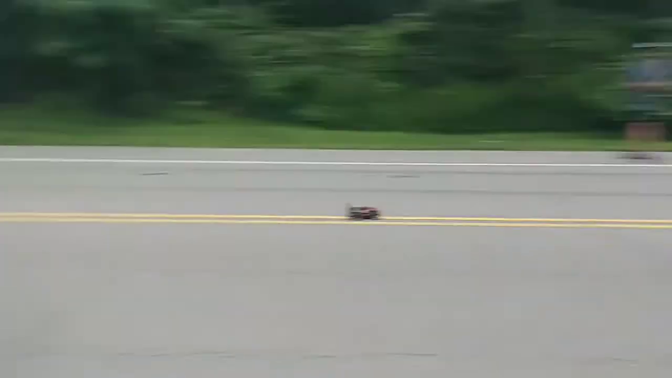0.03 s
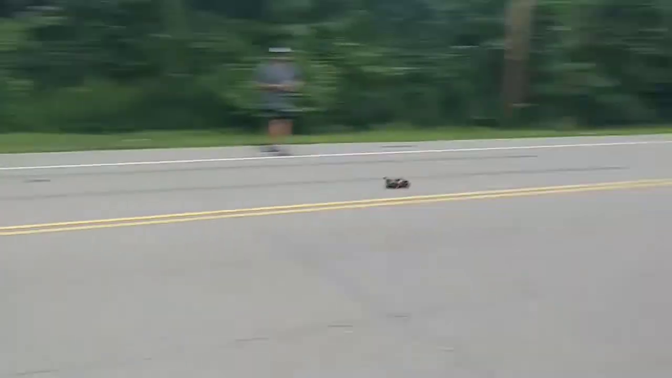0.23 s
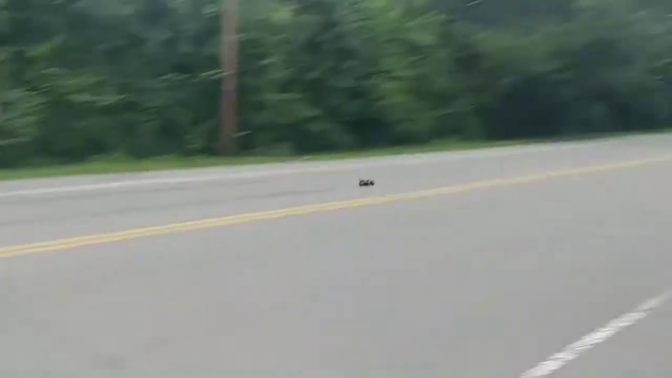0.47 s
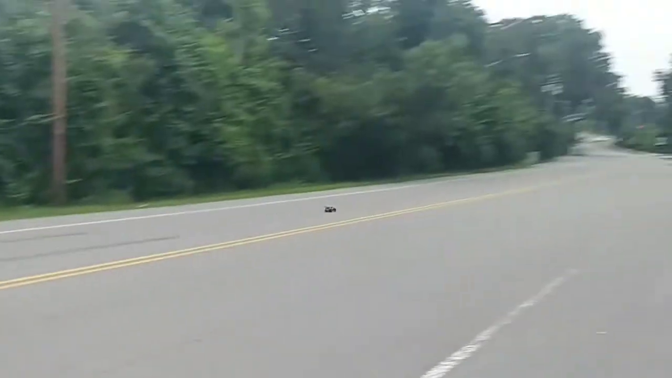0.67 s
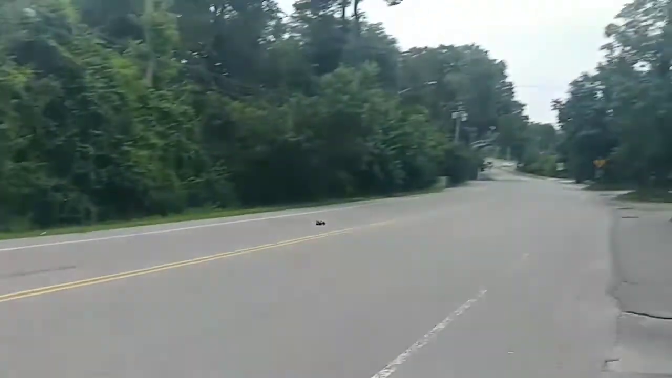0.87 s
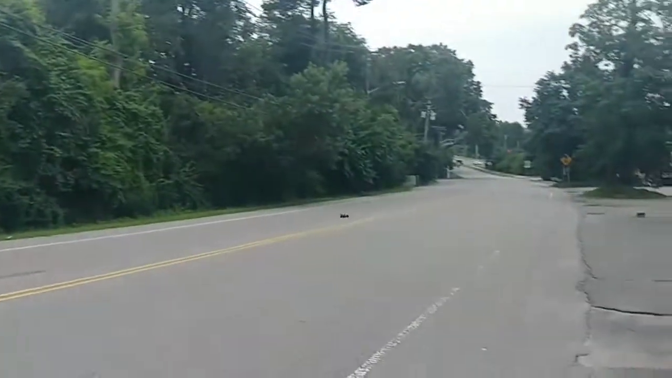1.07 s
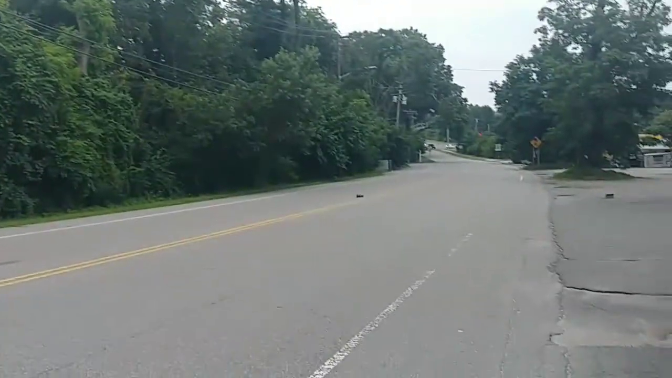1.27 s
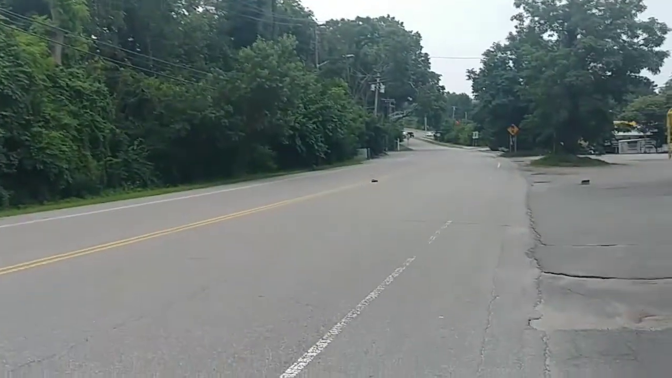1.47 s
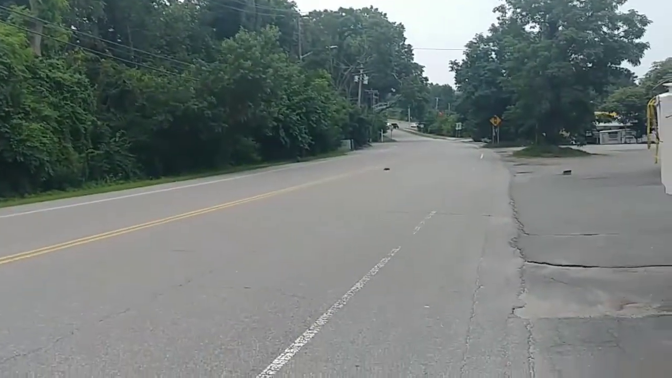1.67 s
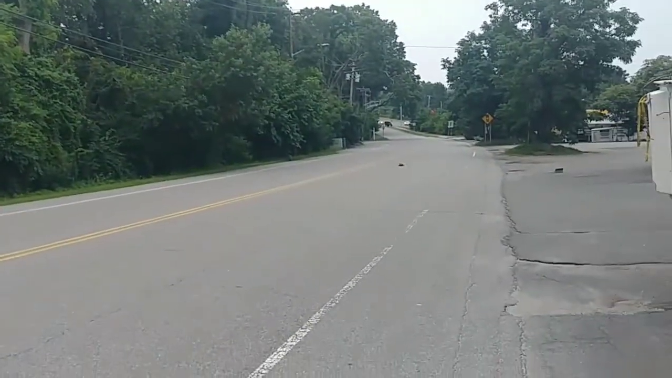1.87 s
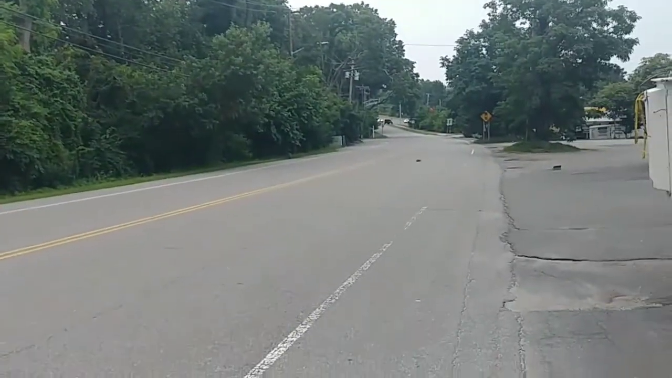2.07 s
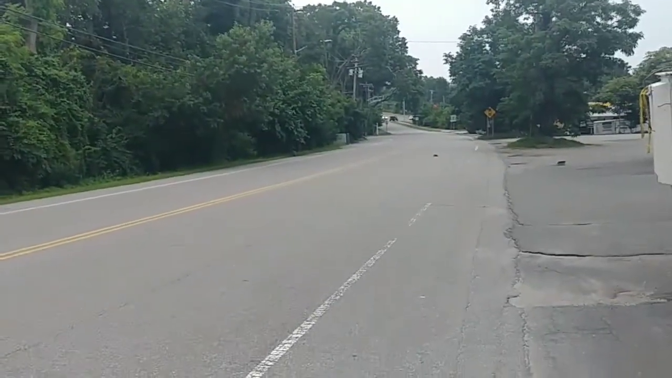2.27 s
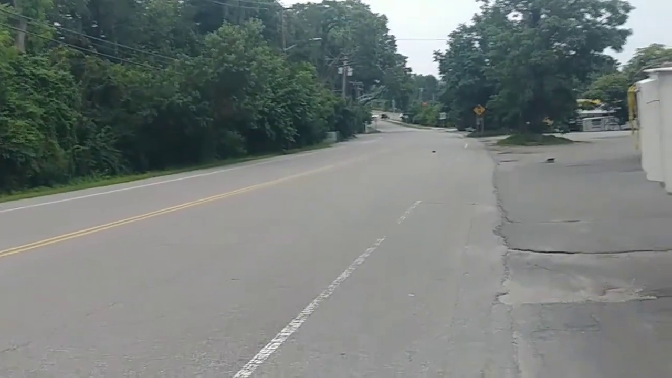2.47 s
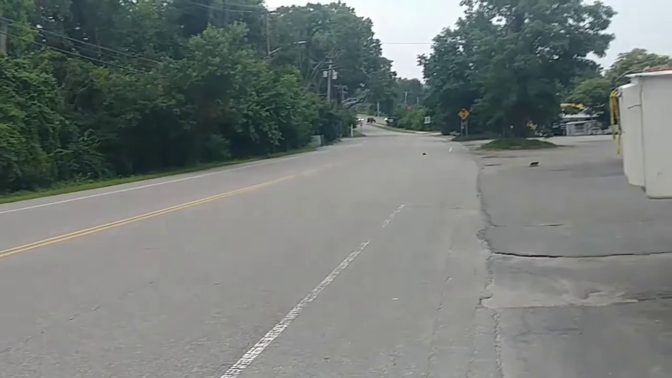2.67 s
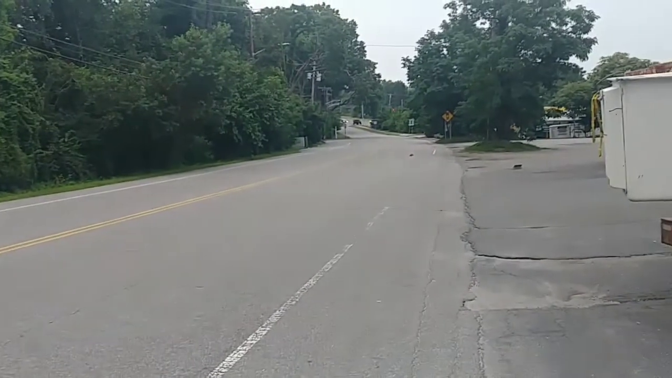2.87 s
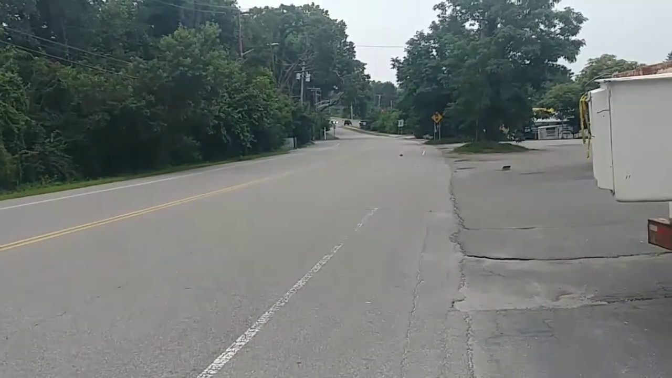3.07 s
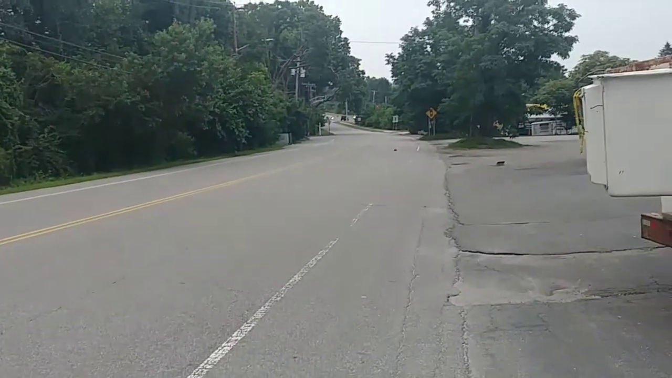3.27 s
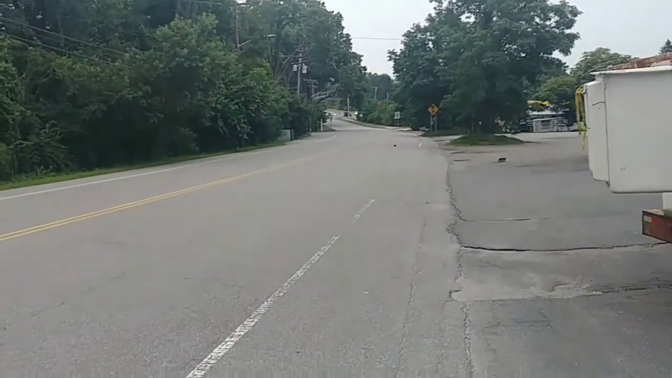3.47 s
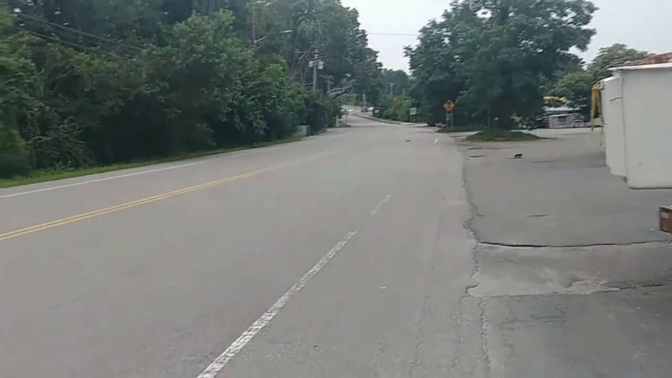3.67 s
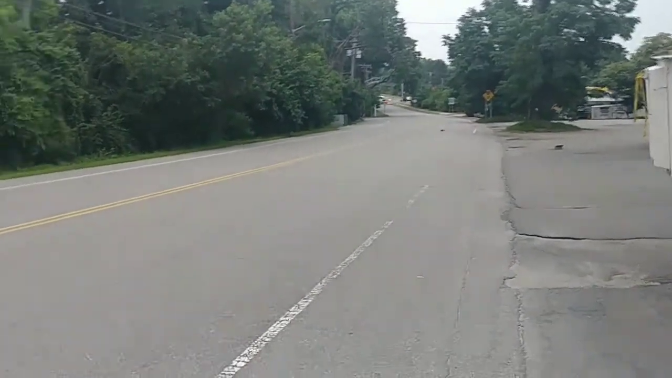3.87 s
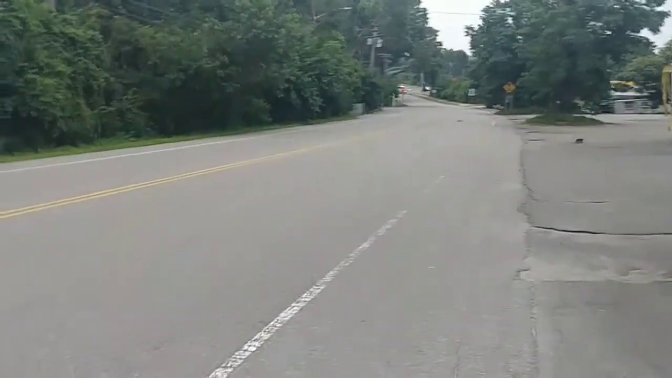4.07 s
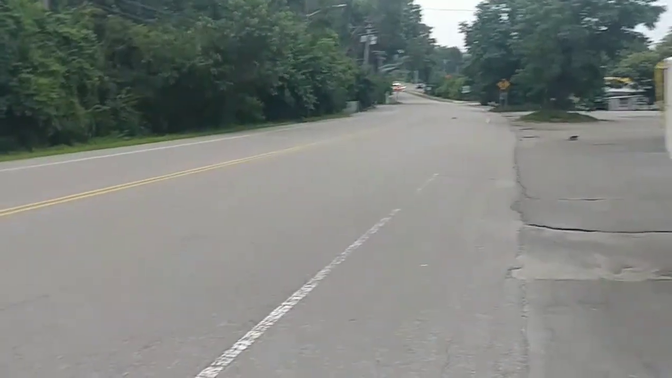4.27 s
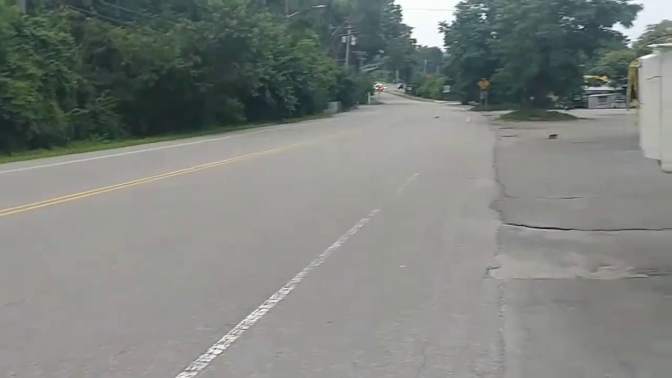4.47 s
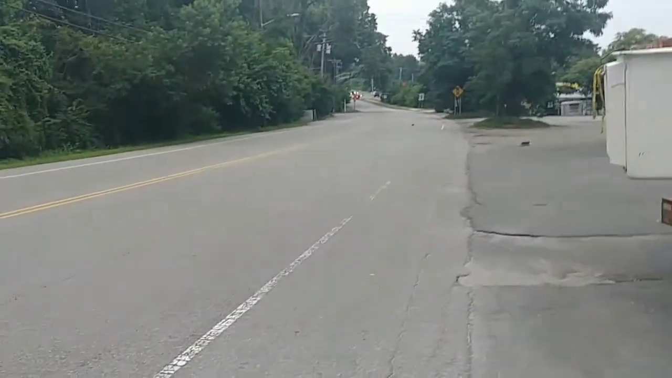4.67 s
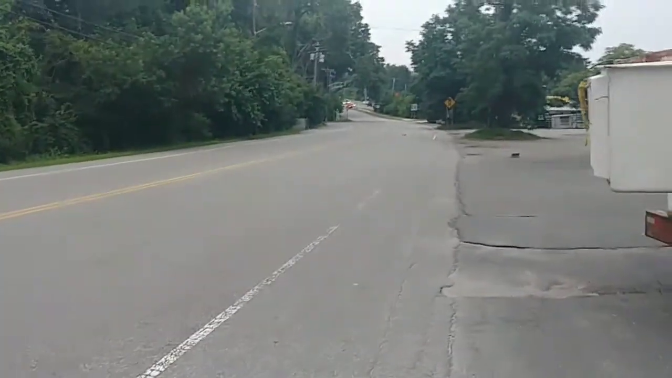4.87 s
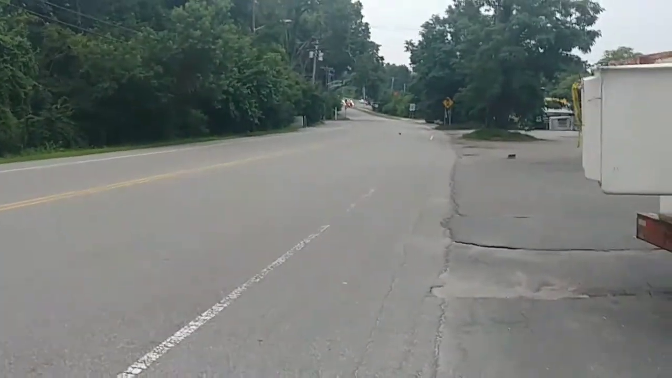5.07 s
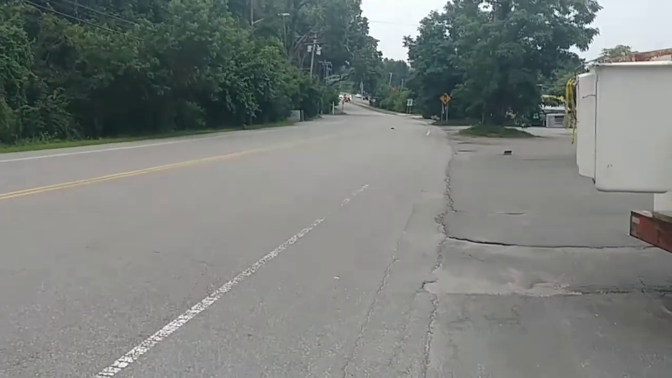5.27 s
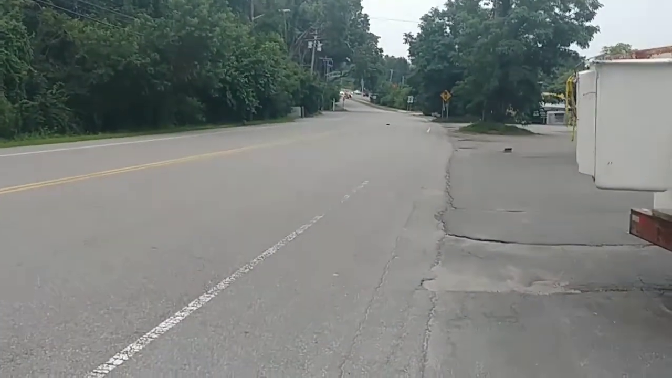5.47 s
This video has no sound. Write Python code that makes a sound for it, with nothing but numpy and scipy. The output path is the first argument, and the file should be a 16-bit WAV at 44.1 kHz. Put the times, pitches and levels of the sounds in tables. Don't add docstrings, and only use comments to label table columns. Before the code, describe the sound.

High gear whine and tyre roar rush away along asphalt, slip in a brief yelp, thin to a hiss, then distant clicks over quiet street hush.

```python
import sys
import numpy as np
from scipy import signal
from scipy.fft import rfft, irfft, next_fast_len
from scipy.io import wavfile
from scipy.ndimage import uniform_filter1d

SR = 44100
rng = np.random.default_rng(int(sys.argv[2]) if len(sys.argv) > 2 else 0)


def put_to_file(sound):
    columns = np.atleast_2d(sound).T
    safe = np.clip(columns, -1, 1)
    whole_steps = np.round(safe * 32767)
    wavfile.write(sys.argv[1], SR, whole_steps.astype(np.int16))


def amplitude_ratio(level_db):
    exponent = np.asarray(level_db, float) / 20
    return 10 ** exponent


N = 243449
T = np.arange(N) / SR

# f/Hz, density/dB per Hz
STREET = [(20, -88.5), (45, -83), (65, -74), (100, -76), (170, -72.5), (260, -77.5), (500, -84),
          (1000, -85), (1600, -89), (2200, -91), (4000, -99), (5600, -104), (8000, -108), (12600, -111),
          (13300, -121), (16000, -121)]
# t/s, length/s, f/Hz, level/dB
PUFFS = [(0, 0.2, 179, -54), (.12, .2, 54.2, -58), (0.28, 0.25, 185, -57.5), (0.522, 0.24, 175.6, -55.5),
         (2.498, .05, 170, -58.5), (2.98, 0.24, 166.3, -53.5), (2.898, .25, 65, -64.5),
         (3.289, 0.1, 192, -58.5), (3.498, .2, 60.1, -66), (4.35, 0.18, 149.2, -60.5),
         (4.321, 0.24, 75, -62)]
# t/s, length/s, f/Hz, level/dB
ECHOES = [(.68, 0.1, 385, -63), (.79, .12, 365, -59.5), (1.765, 0.21, 1010, -62.5),
          (2.5, .07, 1040, -64), (1.94, 0.089, 1220, -62.5), (1.5, .07, 1210, -63),
          (1.72, 0.15, 1650, -75), (1.7, 0.066, 1900, -68), (1.95, 0.08, 1500, -63.5),
          (2.7, .07, 1200, -66.5), (2.02, 0.35, 1900, -66.5), (1.87, 0.59, 2130, -63.5),
          (2.2, 0.17, 2150, -62), (2.09, 0.24, 2000, -70), (2.12, 0.087, 1070, -66.5),
          (2.26, 0.089, 1660, -62), (2.325, 0.049, 1725, -63), (2.1, 0.0695, 960, -70),
          (2.2, .1, 380, -71), (2.79, 0.064, 800, -61.5), (2.5, 0.13, 1485, -67),
          (1.8, .14, 2400, -68),
          (2.97, .54, 2660, -63.5), (3.37, .06, 2176, -68.5), (3.62, .3, 2620, -71),
              (3.66, 0.095, 2100, -69), (3.667, .08, 1770, -69), (3.702, 0.08, 1400, -69.5),
              (3.7, .06, 1050, -67), (3.926, .08, 2050, -69), (3.979, .06, 1460, -65),
              (3.992, .06, 1780, -68), (4.035, .03, 1393, -68), (4.09, .07, 1150, -72),
              (4.102, .06, 1440, -74), (3.74, .14, 5050, -84), (4.1, .055, 2880, -76),
              (4.2, .09, 3050, -78), (4.431, .08, 2950, -74), (4.7, .08, 3074, -76),
              (5.038, .19, 3194, -74), (5.27, .08, 3205, -72.5), (5.387, .13, 3640, -76.5),
              (5.41, .14, 3000, -72), (5.171, .13, 4450, -79), (5.32, .22, 4470, -78.5),
              (4.933, .1, 3137, -77.5), (4.03, .44, 8400, -92), (4.6, .45, 8470, -88),
              (4.06, .91, 6900, -86), (4.15, 0.69, 7690, -85), (5.02, .26, 7820, -84.5),
              (5.23, .3, 7790, -89), (5.04, .12, 8500, -89.5), (5.36, .18, 8600, -89)]
# thud/dB, upper crack/dB, echo/dB
STONES = [
    (3.6204, -37, -22, 8, -37),
    (3.654, -18.5, -7, -3, -35),
    (3.915, -17.5, -36, -4.5, -40),
    (3.924, -26.5, -32, -12, -29.5),
    (3.944, -54, -20, -8, -27),
    (4.017, -36, -18, 8.5, -42),
    (4.057, -20.5, -7, -11, -48),
]
# t/s, peak
# level/dB, f/Hz
TICKS = [(2.9, -33, 3123), (3.045, -31, 3535), (3.5743, -44, 4020), (3.607, -39, 3950),
         (3.6545, -40.5, 930), (3.7609, -33, 3920), (3.831, -34, 3830), (4.117, -52, 4040),
         (4.1676, -40, 3920), (4.2023, -32.5, 4030), (4.239, -35, 4060), (4.2735, -34.5, 4100),
         (4.3283, -37, 4040), (4.364, -37, 4020), (4.439, -37.5, 3870), (4.458, -38, 3820),
         (4.4776, -38, 3540), (4.5183, -39.5, 3740), (4.5783, -39.5, 3900), (4.6421, -45, 3640),
         (4.7474, -41.5, 3850), (5.0034, -45.5, 3895)]
# t/s, f/Hz, level/dB
UPPER_SLIDE = [
    (2.44, 1866, -84),
    (2.485, 1830, -53.5),
    (2.56, 1745, -60.5),
    (2.62, 1718, -60),
    (2.68, 1672, -48),
    (2.73, 1652, -56),
    (2.84, 1575, -61),
    (2.9, 1540, -80),
]
LOWER_SLIDE = [
    (2.53, 1050, -76),
    (2.59, 1063, -52),
    (2.66, 1055, -55),
    (2.72, 1065, -52),
    (2.8, 1090, -57),
    (2.87, 1075, -80),
]
# multiple of shaft rate/1, level/dB
SHAFT_ORDERS = [(3, -8), (4, 1), (5, -17), (6, -3.5), (7, 0), (8, 5.5), (9, -3), (10, 0.5), (12, 4.5)]
# t/s, f/Hz, level/dB
MESH = [(0, 4280, -24.5), (.07, 4103, -31.5), (.14, 3814, -26), (.225, 3783, -24.5), (.25, 3916, -19.5),
        (.36, 3996, -17), (.43, 3934, -23), (.55, 3910, -22.5), (.61, 3880, -35), (.67, 3780, -31),
        (.76, 3768, -27.5), (.82, 3690, -30)]
# t/s, f/Hz, level/dB
YELP = [
    (.828, 3330, -39),
    (.84, 3220, -25.5),
    (.864, 3050, -21),
    (.885, 2850, -26),
    (.91, 2700, -27.5),
    (.935, 2590, -29),
    (.96, 2520, -45),
]
# t/s, f/Hz, level/dB
RIDGE = [(.8, 5086, -47), (1.0, 4980, -36.5), (1.1, 4750, -38.5), (1.4, 4246, -35), (1.48, 4400, -38),
         (1.58, 4570, -47), (1.72, 4492, -43), (1.88, 4380, -43), (2.2, 4300, -44.5), (2.5, 4403, -60),
         (4.0, 4550, -67), (4.18, 4600, -66), (4.35, 4500, -74), (4.55, 4520, -60.5), (4.72, 4400, -71)]
# t/s, f/Hz, level/dB
TRAY = [(.81, 3510, -41), (.85, 3330, -19), (.9, 3200, -27), (.97, 3043, -23.5), (1.08, 3188, -28),
        (1.2, 3007, -41), (1.35, 2877, -36), (1.47, 2990, -52), (1.52, 2967, -32.5), (1.62, 3134, -30),
        (1.75, 3190, -35), (1.9, 3070, -53)]
# t/s, gear level/dB, shell f/Hz, shell level/dB re gears (how far it faces the microphone)
CAR = [(0, -13.5, 4170, 9), (.05, -15.5, 4048, 2.5), (.35, -17.5, 4032, -0.5), (.71, -23.5, 3664, -2),
       (.89, -27, 3390, -6), (1.22, -29.5, 3530, -30), (1.66, -33.5, 3296, -25), (1.89, -35.5, 3800, -31),
       (2.18, -34.5, 3726, -8), (2.33, -40, 3680, -2.5), (2.72, -41, 3546, -15), (2.86, -43, 3626, -6.5),
       (3.8, -46, 3952, 0), (4.15, -51.5, 4007, 5), (4.76, -59, 3810, 2), (4.91, -52, 3626, 9.5),
       (5.3, -62, 3900, 3.5), (5.52, -59, 3855, 9.5)]
# t/s, hiss level/dB re gears
LOAD = [(0, -23), (.5, -20.5), (1.0, -21), (1.45, -26.5), (1.68, -19.5), (1.9, -22.5), (2.2, -20.5),
        (2.42, -25), (2.86, -20.5), (3.45, -16.5), (3.68, -16), (3.85, -22), (4.1, -18), (4.5, -21.5),
        (5.52, -24.5)]
# f/Hz, density/dB per Hz
TYRES = [(90, -46.5), (170, -21), (300, -22), (540, -17), (700, -2.5), (1050, 3), (1300, -1), (1700, 3),
         (1950, -2), (2250, 2), (2700, -11.5), (3200, -57)]
GEARS = [(1700, -17.5), (2300, -14.5), (2600, -1), (3200, 1.5), (3900, 1.5), (4500, -0.5), (4850, -14.5),
         (5150, -22), (6000, -35.5), (7000, -52)]
MOTOR = [(5000, -26.5), (5900, -11.5), (6600, -1.5), (7300, 3), (7850, 4), (8400, 0), (9000, -7),
         (9600, -36.5)]
TOP = [(4500, -18.5), (5000, 21.5), (5400, 4), (6000, -15.5), (8500, -8.5), (9500, 2.5), (11500, -3),
       (13200, -14.5), (14300, -2.5), (15700, -4)]
# f/Hz, width/Hz, start t/s
NOTCHES = [
    (510, 194, 0.35),
    (1250, 400, 1.44),
    (1936, 350, 1.62),
]

STREET_FADE_DB, STREET_FADE_S = 1, 4.8
PUFF_WIDTH_HZ = 69
ECHO_Q, ECHO_TONE = 17.5, 0.46
TREES_T60_S = 0.48
TICK_S = 0.0009
SHAFT_HZ, SHAFT_SAG_HZ_PER_S = 105.1, 7.3
ORDERS_DB, ORDERS_LOSS_DB_PER_S, ORDERS_END_S, ORDERS_FADE_S = -40, 13, 0.696, 0.12
LOW_ORDER_LOSS_DB_PER_S = 13
SIDE_SHARE, SIDE_FADE_S = 1.15, 0.33
OVERTONE_DB = -19.5
TYRE_DB, GROUND_KNEE_S, GROUND_LOSS_DB = -6, 1.963, 8.5
TOP_DB, AIR_LOSS_DB_PER_S = -19.5, 2.5
TOP_FOLLOWS, MEAN_LOAD_DB = 0.6, -23
LIFT_S, LIFT_LENGTH_S, LIFT_DROP_DB = 2.48, 0.33, 25
SURGE_DB = 0.5
GEAR_DIP_HZ, GEAR_DIP_WIDTH_HZ, GEAR_DIP_FROM_S, GEAR_DIP_GROWS_S = 2860, 364, 4, 0.2
NOTCH_GROWS_S = 0.12
MARGIN_DB, HOLD_S, DEPTH_DB, LATCH_DB = 5.5, 0.02, -19, 3.2
CUTOFF_HZ = 15800


def rms_one(x):
    return x / np.sqrt(np.mean(x ** 2) + 1e-20)


def in_time(rows):
    s, *columns = np.transpose(rows)
    return [np.interp(T, s, c) for c in columns]


def within(rows):
    return (T > rows[0][0]) * (T < rows[-1][0])


def ramp(start, length):
    return np.clip((T - start) / length, 0, 1)


def at_hz(points, hz):
    f, level = np.transpose(points)
    return np.interp(np.log(hz), np.log(f), level, left=-200, right=-200)


def drift(rate):
    r = np.exp(-80 * np.pi * rate / SR)
    white = rng.standard_normal(N // 40 + 2002)
    slow = signal.lfilter([1], [1, -2 * r, r * r], white)[2000:]
    return np.interp(np.arange(N) / 40, np.arange(len(slow)), rms_one(slow))


def resonance(x, hz, width_hz):
    r = np.exp(-np.pi * width_hz / SR)
    poles = [1, -2 * r * np.cos(2 * np.pi * hz / SR), r * r]
    return signal.lfilter([(1 - r * r) / 2, 0, (r * r - 1) / 2], poles, x)


def coloured(x, spectrum, patchy_db):
    size = next_fast_len(N, real=True)
    hz = np.maximum(np.fft.rfftfreq(size, 1 / SR), 1)
    shaped = rfft(x, size) * amplitude_ratio(at_hz(spectrum, hz))
    ends_hz = [spectrum[0][0], spectrum[-1][0]]
    place = np.interp(np.log(hz), np.log(ends_hz), [0, 11])
    out = np.zeros(N)
    for k in range(12):
        band = np.clip(1 - np.abs(place - k), 0, 1)
        out += irfft(shaped * band, size)[:N] * amplitude_ratio(patchy_db * drift(8.9))
    return out


def wavering(hz, level_db, width_hz, loose):
    phase = 2 * np.pi * np.cumsum(hz) / SR
    in_phase = (1 + loose * drift(width_hz)) * np.cos(phase)
    quadrature = loose * drift(width_hz) * np.sin(phase)
    return amplitude_ratio(level_db + 2.0) * (in_phase + quadrature) / np.sqrt(1 + 2 * loose ** 2)


def grit(size_db):
    return rms_one(rng.standard_normal(N) * amplitude_ratio(size_db * np.clip(drift(330), -2, 2)))


def swells(rows):
    out, white = np.zeros(N), rng.standard_normal(N)
    for s, length, hz, level_db, width_hz in rows:
        span = slice(int(max(s, 0) * SR), min(int((s + length) * SR), N))
        size = span.stop - span.start
        lead_in = white[:span.stop][-SR:]
        narrow = rms_one(resonance(resonance(lead_in, hz, width_hz), hz, 1.5 * width_hz))
        tone = ECHO_TONE * np.sqrt(2) * np.sin(2 * np.pi * hz * T[span])
        swell = np.sin(np.pi * np.linspace(0, 1, size) ** 0.6) ** 1.1
        out[span] += amplitude_ratio(level_db + 9.5) * swell * rms_one(rms_one(narrow[-size:]) + tone)
    return out


def street():
    wash_db = STREET_FADE_DB * (0.5 - np.clip(T / STREET_FADE_S, 0, 1) ** 2)
    white = rng.standard_normal(N) * np.sqrt(SR / 2)
    return coloured(white, STREET, patchy_db=0.3) * amplitude_ratio(wash_db)


def puffs():
    return swells([(*row, PUFF_WIDTH_HZ) for row in PUFFS])


def roadside_echoes():
    return swells([(*row, np.clip(row[2] / ECHO_Q, 40, 100)) for row in ECHOES])


def slides():
    upper = wavering(*in_time(UPPER_SLIDE), width_hz=60, loose=1)
    lower = wavering(*in_time(LOWER_SLIDE), width_hz=45, loose=0.3)
    return (upper + lower) * within(UPPER_SLIDE)


def stones():
    s, peak_db, thud_db, upper_db, echo_db = np.transpose(STONES)
    low, mid, high, back = np.full((4, N), 1e-18)
    at = ((s + 0.000984) * SR).astype(int)
    low[at] = amplitude_ratio(peak_db + thud_db)
    mid[at] = amplitude_ratio(peak_db)
    high[at] = amplitude_ratio(peak_db + upper_db)
    back[at + 500] = amplitude_ratio(peak_db + echo_db)
    thud = resonance(resonance(low, 620, 480), 720, 700) * amplitude_ratio(26)
    main_mode = resonance(resonance(mid, 1200, 500), 1300, 650)
    upper_mode = resonance(resonance(mid, 2080, 350), 2080, 450)
    body = (main_mode + 0.2 * upper_mode) * amplitude_ratio(24)
    crack = resonance(resonance(resonance(high, 3300, 1100), 3700, 1300), 3500, 1800) * amplitude_ratio(22)
    dying = signal.lfilter([1], [1, -amplitude_ratio(-60 / (TREES_T60_S * SR))], back)
    scatter = rms_one(resonance(resonance(grit(size_db=4), 1200, 800), 1350, 1300))
    far = signal.butter(6, 4800, fs=SR, output="sos")
    return signal.sosfilt(far, -thud - body - crack + dying * scatter)


def ticks():
    out, age = np.zeros(N), np.arange(600) / SR
    for s, peak_db, hz in TICKS:
        at = int(s * SR)
        swell = age / TICK_S * np.exp(-age / TICK_S)
        out[at:at + 600] += amplitude_ratio(peak_db + 5) * swell * np.sin(2 * np.pi * hz * age)
    return out


def shaft_hz():
    return SHAFT_HZ - SHAFT_SAG_HZ_PER_S * np.minimum(T, 1)


def shaft_orders():
    turns = shaft_hz()
    orders = np.zeros(N)
    for k, level_db in SHAFT_ORDERS:
        loss_db = (ORDERS_LOSS_DB_PER_S + LOW_ORDER_LOSS_DB_PER_S * (k < 6)) * T
        orders += wavering(k * turns, ORDERS_DB + level_db - loss_db, width_hz=12, loose=0.17)
    return orders * np.clip((ORDERS_END_S - T) / ORDERS_FADE_S, 0, 1) ** 2


def tooth_mesh():
    turn = 2 * np.pi * np.cumsum(shaft_hz()) / SR
    hz, level_db = in_time(MESH)
    mesh = wavering(hz, level_db, width_hz=50, loose=0.15 + 1.2 * np.exp(-T / 0.07))
    octave = wavering(2 * hz, level_db + OVERTONE_DB, width_hz=260, loose=3)
    side = SIDE_SHARE * np.exp(-T / SIDE_FADE_S) * (np.cos(turn) + np.cos(2 * turn))
    return (octave + mesh * (1 + side)) * np.clip((MESH[-1][0] - T) / 0.04, 0, 1)


def whine():
    yelp = wavering(*in_time(YELP), width_hz=90, loose=0.75) * within(YELP)
    ridge = wavering(*in_time(RIDGE), width_hz=120, loose=2.5) * within(RIDGE)
    tray = wavering(*in_time(TRAY), width_hz=520, loose=6) * within(TRAY)
    return shaft_orders() + tooth_mesh() + yelp + ridge + tray


def car():
    gear_db, centre_hz, shell_db = in_time(CAR)
    tyre_db = TYRE_DB - GROUND_LOSS_DB * np.minimum(T / GROUND_KNEE_S, 1.1) ** 5.9
    motor_db, = in_time(LOAD)
    top_db = TOP_DB + TOP_FOLLOWS * (motor_db - MEAN_LOAD_DB)
    top_db = top_db - AIR_LOSS_DB_PER_S * np.minimum(T, LIFT_S) - LIFT_DROP_DB * ramp(LIFT_S, LIFT_LENGTH_S)
    turn = 2 * np.pi * np.cumsum(shaft_hz()) / SR
    throb = np.exp(-T / 0.2) * (np.cos(turn) + 0.19 * np.cos(2 * turn))
    bumps = 0.5 * drift(14) + 0.8 * drift(50)
    air_db = 0.6 + 0.55 * T
    rattle = grit(size_db=1.6)

    carrier = np.exp(2j * np.pi * np.cumsum(centre_hz) / SR)
    shell = np.real(carrier * (drift(190) + 1j * drift(190)))
    gears = rms_one(coloured(rattle, GEARS, 0.86 * air_db)) + amplitude_ratio(shell_db) * shell
    gears = gears / np.sqrt(1 + amplitude_ratio(shell_db) ** 2) * amplitude_ratio(2.0 * throb + bumps)
    dip = resonance(gears, GEAR_DIP_HZ, GEAR_DIP_WIDTH_HZ)
    gears = gears - 0.46 * ramp(GEAR_DIP_FROM_S, GEAR_DIP_GROWS_S) * dip

    tyres = rms_one(coloured(grit(size_db=1.5), TYRES, 1.5 * air_db))
    tyres = tyres * amplitude_ratio(tyre_db + 0.71 * throb + 0.28 * bumps)
    tyres = tyres * np.clip((2.45 - T) / 0.25, 0, 1)
    roar = gears + tyres
    for hz, width_hz, start in NOTCHES:
        roar = roar - ramp(start, NOTCH_GROWS_S) * resonance(roar, hz, width_hz)

    surge = SURGE_DB * drift(19)
    motor = rms_one(coloured(rattle, MOTOR, 0.71 * air_db))
    motor = motor * amplitude_ratio(motor_db + 1.1 * throb + 0.46 * bumps + 0.5 * surge)
    top = rms_one(coloured(rattle, TOP, air_db))
    top = top * amplitude_ratio(top_db + 1.1 * throb + 1.2 * bumps + surge)
    return amplitude_ratio(gear_db) * (roar + motor + top)


def scene():
    background = street() + puffs() + roadside_echoes() + slides()
    return (background + stones() + ticks() + whine() + car())[None]


def suppress(x):
    hz, _, cells = signal.stft(x, SR, nperseg=512, noverlap=384, scaling="psd")
    power = uniform_filter1d(2 * np.abs(cells) ** 2, size=3, axis=0)
    r = np.exp(-128 / (HOLD_S * SR))
    smooth = signal.lfilter([1 - r], [1, -r], power, axis=1)
    power = np.maximum(smooth, 0.53 * power)
    threshold = amplitude_ratio(at_hz(STREET, np.clip(hz, 170, 15900)) + MARGIN_DB)
    above = power / threshold[:, None] ** 2
    opened, state = np.zeros(above.shape), np.ones(len(hz))
    for i, column in enumerate(above.T):
        latched = column * amplitude_ratio(2 * LATCH_DB * (state - 1))
        state = 1 / (1 + (latched + 1e-9) ** -3)
        opened[:, i] = state
    gain = np.maximum(uniform_filter1d(opened, size=3, axis=1), amplitude_ratio(DEPTH_DB))
    return signal.istft(cells * gain, SR, nperseg=512, noverlap=384, scaling="psd")[1][:N]


def low_pass(x):
    return signal.sosfilt(signal.butter(12, 16320, fs=SR, output="sos"), x)


def record(dry):
    low_edge = signal.butter(2, 70, "high", fs=SR, output="sos")
    high_edge = signal.ellip(10, 0.5, 45, CUTOFF_HZ - 100, fs=SR, output="sos")
    x = signal.sosfilt(low_edge, suppress(dry[0]))
    mix = signal.sosfilt(high_edge, x)[None]
    return low_pass(mix)


dry = scene()
out = record(dry)
put_to_file(out)
```